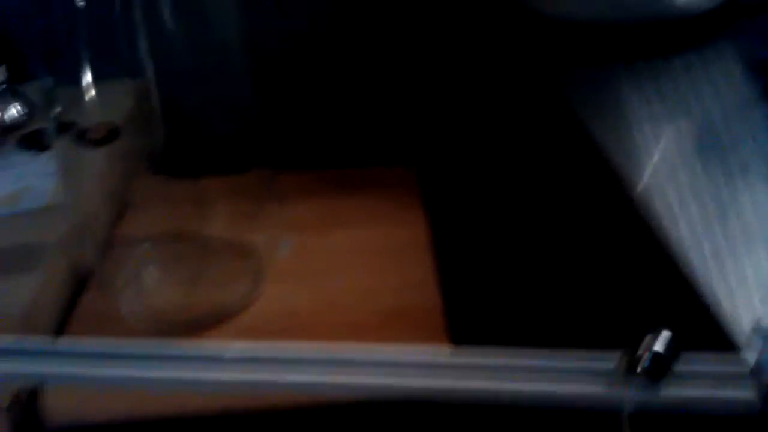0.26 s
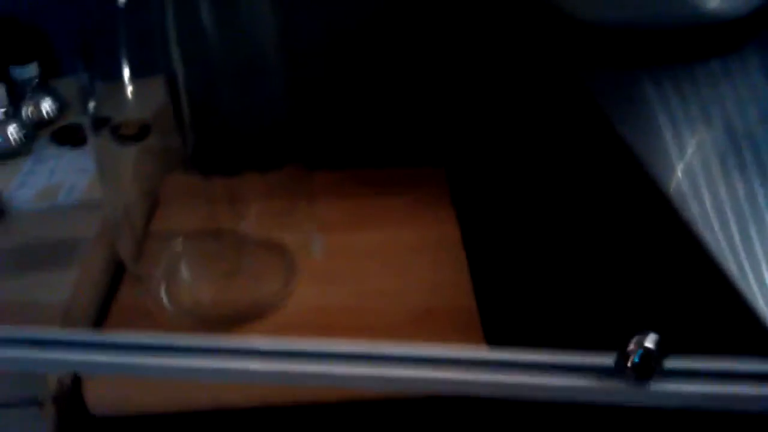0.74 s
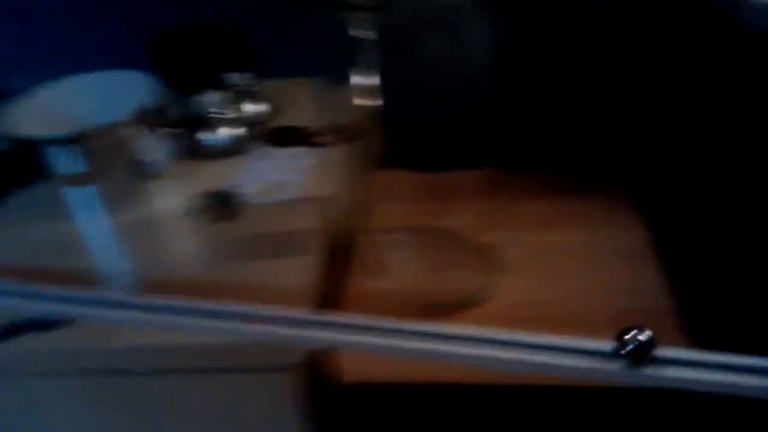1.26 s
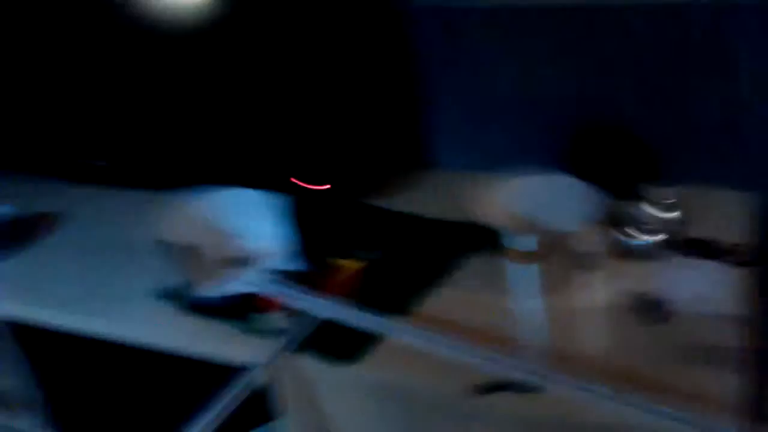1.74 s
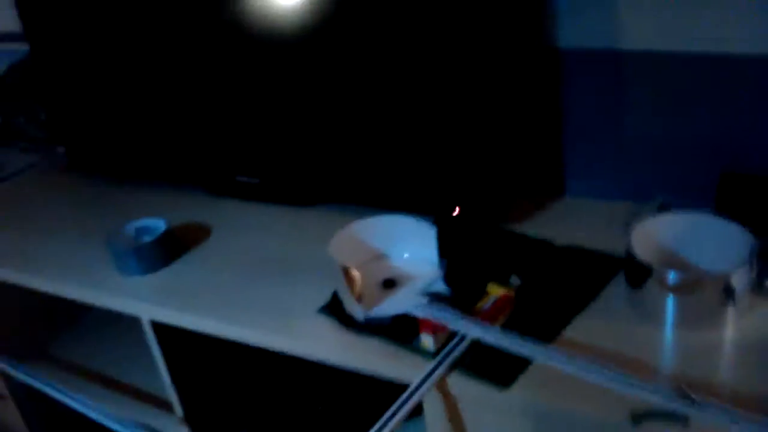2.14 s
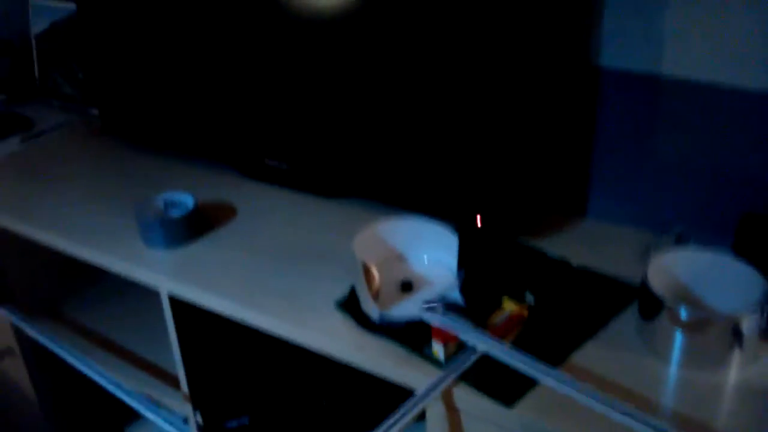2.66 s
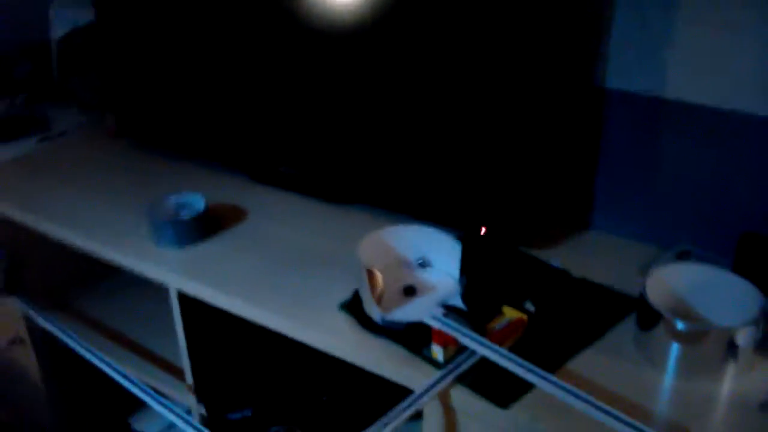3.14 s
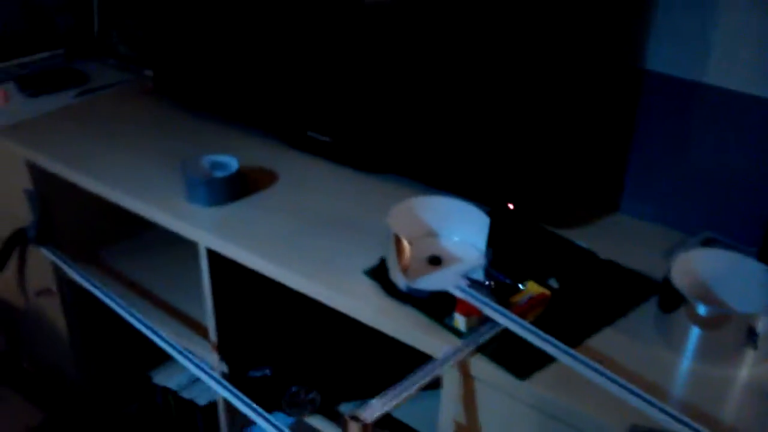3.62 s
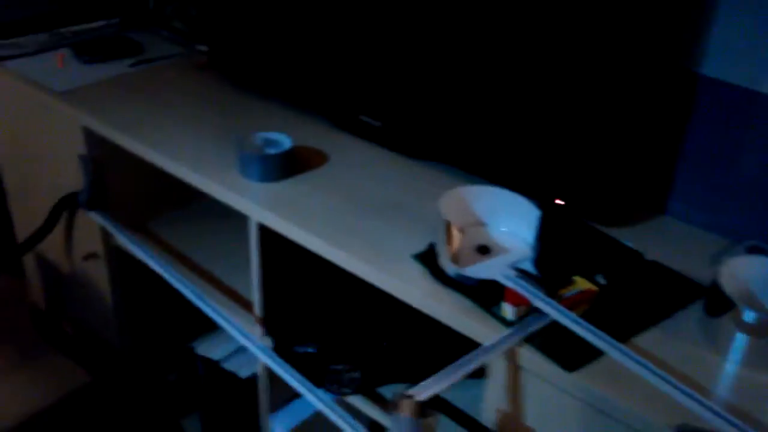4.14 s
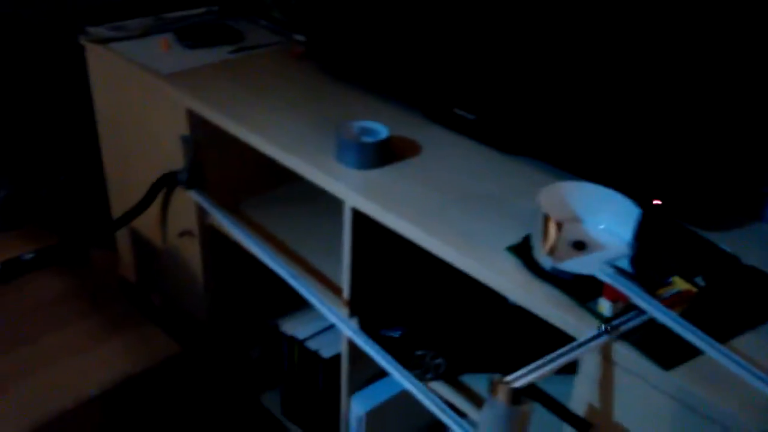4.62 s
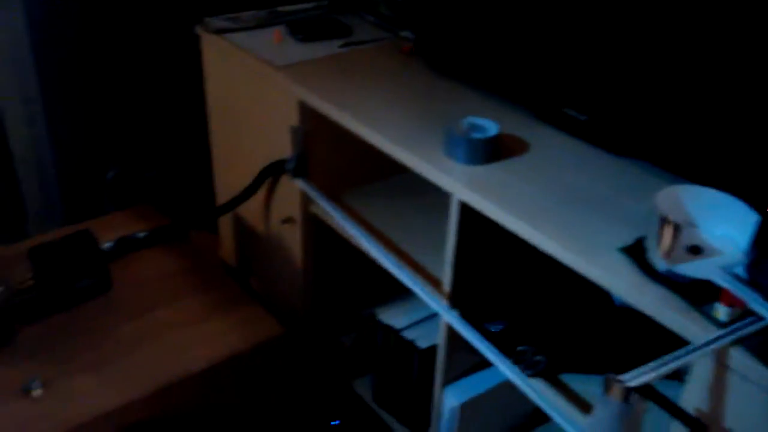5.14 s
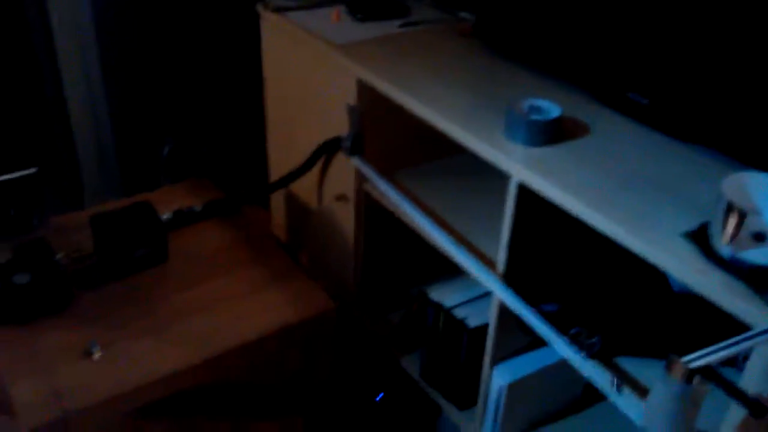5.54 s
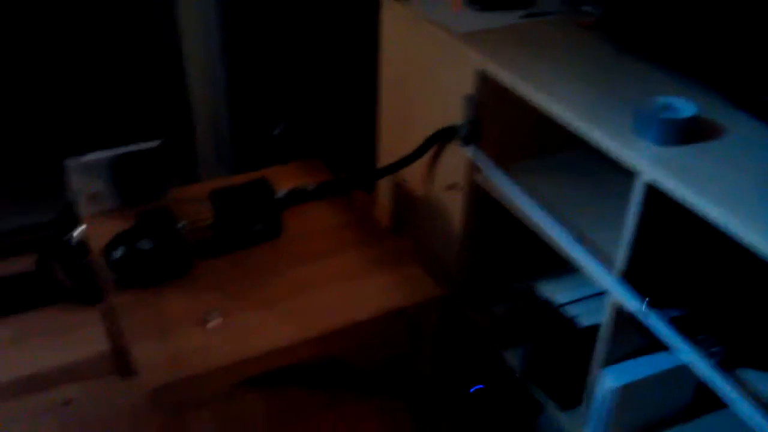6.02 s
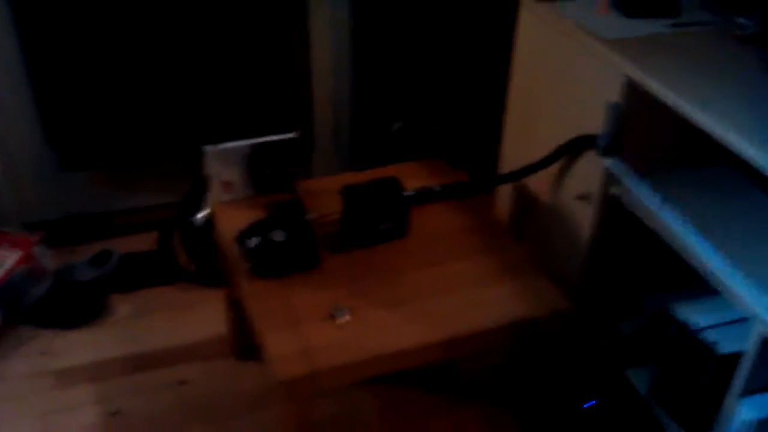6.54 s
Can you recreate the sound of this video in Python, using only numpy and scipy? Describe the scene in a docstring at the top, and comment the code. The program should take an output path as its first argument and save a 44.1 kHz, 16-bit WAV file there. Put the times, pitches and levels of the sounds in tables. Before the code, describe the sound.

A small, fairly dry room with soft noise and a faint mains buzz that weakens as the close microphone turns away. Tiny ticks come at 0.1, 0.4 and 0.85 s as a steel ball barely creeps on a metal rail. Light knocks at 1.2-1.4 s precede a sharp clack over a joint at 1.5; bright, grainy rolling then gathers speed until a hard stop at 2.8. Hollow cup knocks follow at 2.9-3.1, then thin hissing scrapes until 3.6, ending in a fuller rub. Rattling from 3.7 gives way to a loud clack at 4.0. After a pause, the ball lands ringing on a duller rail at 4.5, rolling faster from 4.9 with cup knocks near 5.2. At 5.3 a huge, clipped crash thumps the wooden cabinet; clanging bounces fade by 5.7. Brighter rolling swells from 5.9, with a knock at 6.45, still running at the end.

```python
"""A chain-reaction machine in a small room: a steel ball creeps down a metal rail, clacks over a joint and gathers speed.
It hits the end stop, knocks about in a cup, scrapes, and rattles a loose part until that gives way with a clack.
It drops onto a duller second rail, rolls on, crashes against the cabinet and runs down a brighter third rail.
Noise bumps and cracks ring each body's resonances, decaying sines add clear tones, and the loudest blows clip.
Under it all lies room noise and a faint mains buzz that fades as the microphone turns away."""
import sys
import numpy as np
from scipy import signal
from scipy.fft import rfft, irfft, next_fast_len
from scipy.io import wavfile
from scipy.ndimage import map_coordinates

SR = 44100
rng = np.random.default_rng(int(sys.argv[2]) if len(sys.argv) > 2 else 0)


def output_pcm(signal):
    """Save a mono or channel-first signal as 16-bit PCM at the path in sys.argv[1].

    Samples are clipped to [-1, 1] before scaling.
    """
    pcm = np.clip(np.atleast_2d(signal).T, -1, 1) * 32767
    wavfile.write(sys.argv[1], SR, np.round(pcm).astype(np.int16))


N = 298557
T = np.arange(N) / SR
SIZE = 16384  # FFT length for body responses, samples
GRID = np.fft.rfftfreq(SIZE, 1 / SR)


def amp(db):
    """Decibels to gain."""
    return 10 ** (np.asarray(db) / 20)


def unit(x):
    """Scaled to rms 1."""
    return x / np.sqrt(np.mean(x ** 2) + 1e-20)


def along(points, hz):
    """Curve through (Hz, value) points, read on a log frequency axis."""
    f, value = np.transpose(points)
    return np.interp(np.log(hz + 1), np.log(f + 1), value)


def wobble(rate):
    """A smooth random curve with rate knots a second."""
    knots = rng.standard_normal(int(N * rate / SR) + 4)
    return map_coordinates(knots, [T * rate])


def response(colour, modes=(), dense_db=0):
    """Minimum-phase impulse response of a body: separate resonances standing on a dense bed of others."""
    power = amp(along(colour, GRID) + dense_db) ** 2
    for hz, half_width, db in modes:
        resonance = amp(db) / (1 + ((GRID - hz) / half_width) ** 2)
        power = power + resonance ** 2
    # folding the cepstrum makes the response start at once
    cepstrum = irfft(np.log(power + 1e-12) / 2)
    cepstrum[1:SIZE // 2] *= 2
    cepstrum[SIZE // 2 + 1:] = 0
    h = irfft(np.exp(rfft(cepstrum)))[:SIZE // 2]
    return h / np.linalg.norm(h)


def through(x, h):
    """x played through an impulse response."""
    return signal.fftconvolve(x, h)[:len(x)]


def noise(colour):
    """Coloured noise of rms 1."""
    return unit(through(rng.standard_normal(N), response(colour)))


def sustained(body, tail_db, t60):
    """Long metal keeps many weak modes ringing, here as a decaying noise tail."""
    t = np.arange(len(body)) / SR
    tail = rng.standard_normal(len(t)) * amp(-60 * t / t60)
    return body + amp(tail_db) * through(body, tail / np.linalg.norm(tail))


def rocking(swing_s, rate, speedup, depth_db):
    """Swell in dB of a ball rocking from bar to bar, ever faster, dying away around its widest swing."""
    settle_s = 0.21  # time to fall to 1/e, on both sides
    t = T - swing_s
    swings = rate * t + speedup * t ** 2 / 2
    return depth_db * np.exp(-np.abs(t) / settle_s) * np.cos(2 * np.pi * swings)


def roll(rows, rock, body, bumps, spread_db, patchy_db, uneven_db, low_db, high_db, fizz_db, high_grows, fizz_grows):
    """A rolling ball meets many tiny bumps a second, each ringing the rail; the faster it runs, the brighter."""
    full_pace_db = -27  # rolling level of a fast ball
    s, level = np.transpose(rows)
    pace_db = np.interp(T, s, level, left=-120) - full_pace_db
    hits = rng.random(N) < bumps / SR
    strengths = rng.standard_normal(N) * amp(spread_db * rng.standard_normal(N))
    hz, _, spectrum = signal.stft(through(hits * strengths, body), SR, nperseg=1024)
    # resonances swell and fade as the ball passes their nodes
    smoothing = np.outer(np.hanning(6), np.hanning(9))
    nodes = signal.fftconvolve(rng.standard_normal(spectrum.shape), smoothing, "same")
    spectrum = spectrum * amp(patchy_db * unit(nodes))
    below_high = 1 / (1 + (hz / 2900) ** 12)
    below_fizz = 1 / (1 + (hz / 6500) ** 12)
    bands = [(below_high, 1, low_db),
             (below_fizz - below_high, high_grows, high_db),
             (1 - below_fizz, fizz_grows, fizz_db)]
    out = np.zeros(N)
    for band, grows, db in bands:
        sound = signal.istft(spectrum * band[:, None], nperseg=1024)[1][:N]
        out += unit(sound) * amp(db + grows * pace_db)
    dying_db = 850 * np.maximum(T - s[-1], 0)  # the rail rings out once the ball has left it
    return out * amp(full_pace_db + rocking(*rock) + uneven_db * wobble(35) - dying_db)


def rebounds(rows, count, gap_s, loss_db):
    """Every blow is a quick run of contacts, each weaker than the one before."""
    contacts = []
    for s, ring, tick in rows:
        for k in range(count):
            contacts.append((s + k * gap_s, ring - k * loss_db, tick - k * loss_db))
    return contacts


# wood under the rails: pitch_hz [Hz], level_db [dB, relative]
WOOD_COLOUR = [(25, -42.5), (100, -30.5), (170, -26), (230, 3.5), (310, 1), (550, -5), (900, -3.5),
               (1500, -9.5), (3000, -10), (8000, -77.5)]
# cabinet boards: pitch_hz [Hz], half_width_hz [Hz, to half amplitude], level_db [dB, relative]
BOARD_MODES = [(262, 45, -14.5), (545.5, 30, -3), (1140, 29, -12.5)]
# steel on steel: pitch_hz [Hz], level_db [dB, relative]
STEEL_COLOUR = [(3000, -48), (6000, 2.5), (8500, 6.5), (11000, 1), (15500, -4.5)]


def strikes(rows, body, t60, crack_s, chatter_db, thud_db, thud_life, tick_life):
    """A short crack and a dying chatter ring the body, thud in the wood and tick on the steel ball."""
    out = np.zeros(N + SR)
    t = np.arange(SR // 2) / SR
    wood = response(WOOD_COLOUR, BOARD_MODES)
    steel = response(STEEL_COLOUR)
    head = SR // 100  # levels are set on the first 10 ms
    for s, ring, tick in rows:
        layers = [(body, ring, t60),
                  (wood, ring + thud_db, t60 * thud_life),
                  (steel, tick, t60 * tick_life)]
        for h, db, life in layers:
            crack = amp(-60 * t / crack_s)
            chatter = amp(chatter_db - 60 * t / life)
            sound = through((crack + chatter) * rng.standard_normal(len(t)), h)
            out[round(s * SR):][:len(t)] += amp(db) * sound / np.std(sound[:head])
    return out[:N]


def tones(rows, modes, db, spread_db):
    """Every blow rings the rail's clear tones, decaying sines, at new strengths."""
    out = np.zeros(N + SR)
    t = np.arange(SR // 2) / SR
    hz, level, t60 = np.transpose(modes)[:, :, None]
    onset = 1 - np.exp(-t / 0.0038)
    for s, ring, *_ in rows:
        size, phase = rng.standard_normal((2, len(hz), 1))
        decay = amp(level + spread_db * size - 60 * t / t60)
        partials = decay * np.sin(2 * np.pi * hz * t + np.pi * phase)
        out[round(s * SR):][:len(t)] += amp(ring + db) * partials.sum(0) * onset
    return out[:N]


# pace of the ball, as its rolling level before the band trims: time_s [s], level_db [dB]
FIRST_ROLL = [(0.9, -62.5), (1.19, -52), (1.3, -42.5), (1.66, -37.5), (1.89, -36.5), (1.95, -32),
              (2.24, -29), (2.33, -31.5), (2.45, -25), (2.82, -25.5)]
# rocking between the bars: widest_s [s], rate [swings/s], speedup [swings/s per s], depth_db [dB]
FIRST_ROCK = (1.21, 25, 1.6, 4.1)
# broad colour of the rail: pitch_hz [Hz], level_db [dB, relative]
FIRST_COLOUR = [(150, -65.5), (250, -35.5), (341, -18), (420, -15), (534, -11.5), (1120, -6.5), (1730, 2),
                (3390, -11), (3960, 2), (4630, -4.5), (6100, -13), (7130, -25), (7770, -12.5),
                (15500, -44.5)]
# rail resonances: pitch_hz [Hz], half_width_hz [Hz, to half amplitude], level_db [dB, relative]
FIRST_MODES = [(1306, 19, -0.5), (1763, 39, -5), (1892, 43, -5), (2246, 71, -6), (2750, 64, -13),
               (3095, 23, -1.5), (3443, 110, -7), (3770, 100, -2.5), (4218, 24, 1), (4970, 100, -6),
               (5474, 72, -4), (5970, 80, -5.5), (6710, 96, -12.5), (7270, 17, -10), (7260, 30, -21.5),
               (7645, 66, -7), (8400, 68, -14.5), (9220, 41, -17.5), (9800, 180, -27.5), (9920, 46, -31.5),
               (10600, 110, -25.5)]
# knocks on the rail: start_s [s], ring_db [dB], tick_db [dB]
FIRST_HITS = [(0.1244, -52.5, -55), (0.4122, -59, -58), (0.851, -54, -56), (1.2067, -41.5, -59),
              (1.273, -39, -53), (1.3277, -39, -58.5), (1.4067, -49, -64), (1.545, -25.5, -48.5),
              (1.6394, -25.5, -44), (1.6566, -26, -47.5), (1.70, -29, -56.5), (1.797, -33.5, -49),
              (2.0836, -28, -33.5), (2.40, -27, -54.5), (2.822, -11, -21.5)]
# blow over the joint: start_s [s], ring_db [dB], tick_db [dB]
JOINT_BLOW = [(1.4792, -16, -22)]


def first_rail():
    """The ball creeps, clacks over a joint, gathers speed and hits the end stop."""
    body = sustained(response(FIRST_COLOUR, FIRST_MODES, dense_db=-6.5), tail_db=-8, t60=0.13)
    rolling = roll(FIRST_ROLL, FIRST_ROCK, body, bumps=3500, spread_db=0.5, patchy_db=4.0, uneven_db=1.02,
                   low_db=0, high_db=-0.66, fizz_db=-13, high_grows=1.15, fizz_grows=1.3)
    knocks = strikes(FIRST_HITS, body, t60=0.16, crack_s=0.006, chatter_db=-9.5,
                     thud_db=-30, thud_life=0.84, tick_life=0.93)
    clack = strikes(JOINT_BLOW, body, t60=0.41, crack_s=0.037, chatter_db=-6.5,
                    thud_db=-11, thud_life=0.89, tick_life=0.55)
    return rolling + knocks + clack


# pace of the ball, as its rolling level before the band trims: time_s [s], level_db [dB]
SECOND_ROLL = [(4.62, -47), (4.85, -47), (4.94, -32.5), (5.0, -26.5), (5.08, -31), (5.125, -29),
               (5.165, -31.5), (5.21, -22), (5.255, -26)]
# rocking between the bars: widest_s [s], rate [swings/s], speedup [swings/s per s], depth_db [dB]
SECOND_ROCK = (5.0, 45, 6.9, 3.4)
# broad colour of the rail: pitch_hz [Hz], level_db [dB, relative]
SECOND_COLOUR = [(350, -61), (600, -25), (878, -32), (979, -16.5), (1230, -10.5), (2610, -1), (3330, -18),
                 (4030, -11), (5660, -19), (6670, -30), (6950, -44), (8750, -32), (9370, -62.5),
                 (15500, -51)]
# rail resonances: pitch_hz [Hz], half_width_hz [Hz, to half amplitude], level_db [dB, relative]
SECOND_MODES = [(1640, 14, -22.5), (1771, 21, 6), (1960, 82, 3), (2170, 90, 5), (2673, 72, 0.5),
                (3930, 29, 2), (4260, 21, -2), (4520, 45, -10), (6230, 35, -11)]
# clear tones when struck: pitch_hz [Hz], level_db [dB, relative, before the spread], t60_s [s]
SECOND_TONES = [(2010, 6, 0.125), (2270, 11, 0.12), (3709, -18, 0.17), (4070, 0, 0.08), (4360, -5, 0.16),
                (5060, -4, 0.13), (5880, -7.5, 0.13), (6410, 2, 0.15), (8650, -13, 0.19),
                (14400, -29, 0.11)]
# the ball landing: start_s [s], ring_db [dB, first contact], tick_db [dB, first contact]
LANDING_BLOW = [(4.4978, -13, -31.5)]
# later knocks: start_s [s], ring_db [dB], tick_db [dB]
SECOND_HITS = [(4.7056, -34, -75), (4.8584, -37.5, -69), (4.9239, -27, -62), (5.1015, -25.5, -63)]


def second_rail():
    """The ball clacks onto a duller rail, setting off its clear tones, and rolls to its end."""
    body = sustained(response(SECOND_COLOUR, SECOND_MODES, dense_db=2.5), tail_db=-4.5, t60=.15)
    rolling = roll(SECOND_ROLL, SECOND_ROCK, body, bumps=5000, spread_db=3.8, patchy_db=-3.0, uneven_db=1.9,
                   low_db=0.5, high_db=-7.5, fizz_db=-34.5, high_grows=1.46, fizz_grows=1.2)
    landing = rebounds(LANDING_BLOW, count=4, gap_s=0.0137, loss_db=2.5)
    clacks = strikes(landing + SECOND_HITS, body, t60=0.12, crack_s=0.0222, chatter_db=15,
                     thud_db=-42.5, thud_life=0.49, tick_life=0.4)
    clear_tones = tones(landing, SECOND_TONES, db=-12.5, spread_db=4.5)
    return rolling + clacks + clear_tones


# pace of the ball, as its rolling level before the band trims: time_s [s], level_db [dB]
THIRD_ROLL = [(5.6, -67), (5.72, -43), (5.95, -36), (6.03, -29), (6.29, -29.5), (6.47, -24.5), (6.63, -27),
              (6.77, -24.5)]
# rocking between the bars: widest_s [s], rate [swings/s], speedup [swings/s per s], depth_db [dB]
THIRD_ROCK = (6.08, 11.6, 9, 5.3)
# broad colour of the rail: pitch_hz [Hz], level_db [dB, relative]
THIRD_COLOUR = [(410, -59), (700, -30.5), (850, -48.5), (955, -26), (1630, -11), (1900, -11), (2220, -8.5),
                (3680, -10), (4030, 3), (5640, -5.5), (7400, -24), (8320, -24.5), (15500, -55)]
# rail resonances: pitch_hz [Hz], half_width_hz [Hz, to half amplitude], level_db [dB, relative]
THIRD_MODES = [(2220, 39, -8), (2550, 20, -3.5), (2960, 150, -5), (3240, 48, -0.5), (3540, 170, -3),
               (3916, 76, 8.5), (4440, 9.3, -3.5), (5070, 48, 2), (5490, 34, -1), (5900, 17, -4.5),
               (6310, 200, -12.5), (6660, 57, -25), (7400, 34, -13.5), (7720, 77, -18.5), (8500, 44, -15.5),
               (8230, 44, -38.5), (8910, 73, -27.5), (9130, 50, -24.5), (9900, 24, -27)]
# clear tones when struck: pitch_hz [Hz], level_db [dB, relative, before the spread], t60_s [s]
THIRD_TONES = [(3219, -1, 0.15), (3930, 0, 0.28), (4996, -6, 0.24), (5480, -9, 0.2), (8200, -14, 0.2),
               (8400, -14, 0.2)]
# blow against the cabinet: start_s [s], ring_db [dB, first contact], tick_db [dB, first contact]
CRASH_BLOW = [(5.306, -9, -7)]
# bounces on the rail: start_s [s], ring_db [dB], tick_db [dB]
THIRD_HITS = [(5.344, -2, -20), (5.357, -9, -16.5), (5.4313, -17.5, -34), (5.472, -22, -47),
              (5.529, -17, -37), (5.5709, -22.5, -44.5), (5.605, -34.5, -54.5), (5.6814, -67, -50.5),
              (6.4567, -21.5, -36)]


def third_rail():
    """A heavy blow on the cabinet sets the last rail ringing; the ball bounces on it and speeds away."""
    body = sustained(response(THIRD_COLOUR, THIRD_MODES, dense_db=-2), tail_db=-10, t60=.12)
    rolling = roll(THIRD_ROLL, THIRD_ROCK, body, bumps=6600, spread_db=2.0, patchy_db=3.0, uneven_db=0.63,
                   low_db=-6.5, high_db=0.0, fizz_db=-16, high_grows=1.64, fizz_grows=3.8)
    bounces = strikes(THIRD_HITS, body, t60=0.22, crack_s=0.0099, chatter_db=7.5,
                      thud_db=-52.5, thud_life=0.58, tick_life=0.8)
    blows = rebounds(CRASH_BLOW, count=4, gap_s=0.0127, loss_db=2.3)
    crash = strikes(blows, body, t60=0.09, crack_s=0.059, chatter_db=-5.5,
                    thud_db=8.0, thud_life=.7, tick_life=1.1)
    clang = tones(THIRD_HITS, THIRD_TONES, db=-16.5, spread_db=2)
    return rolling + bounces + crash + clang


# broad colour of the cups: pitch_hz [Hz], level_db [dB, relative]
CUP_COLOUR = [(150, -59), (250, -25), (781, -9), (995, -13.5), (1160, -4.5), (1290, 6), (1820, -10),
              (2200, -4.5), (2900, -18.5), (3830, -9), (6770, -15), (8180, -13.5), (15500, -48)]
# cup resonances: pitch_hz [Hz], half_width_hz [Hz, to half amplitude], level_db [dB, relative]
CUP_MODES = [(980, 31, -3.5), (1290, 110, -8.5), (1590, 130, -2.5), (2020, 68, -7), (4100, 24, -10.5),
             (4560, 94, -16.5)]
# knocks in the cups: start_s [s], ring_db [dB, first contact], tick_db [dB, first contact]
CUP_HITS = [(2.9017, -15.5, -27), (2.9738, -18, -38), (3.048, -35, -43), (3.0954, -41.5, -48.5),
            (5.1764, -23, -34), (5.2025, -25.5, -27), (5.2907, -18, -41)]


def cup():
    """The ball bounces in the hollow cups at the ends of the rails."""
    body = response(CUP_COLOUR, CUP_MODES, dense_db=-5)
    contacts = rebounds(CUP_HITS, count=2, gap_s=0.012, loss_db=3.0)
    return strikes(contacts, body, t60=0.15, crack_s=0.0062, chatter_db=5,
                   thud_db=-41, thud_life=.9, tick_life=1.0)


# the loose part before it gives way: pitch_hz [Hz], level_db [dB, relative]
LOOSE_COLOUR = [(290, -44.5), (500, -24), (914, -28.5), (1240, -8), (1370, -10), (1620, -5.5), (2570, 0.5),
                (2800, -8.5), (3630, -6.5), (7130, -33), (10100, -37.5), (15500, -66.5)]
# rattling against it: start_s [s], ring_db [dB, first contact], tick_db [dB, first contact]
RATTLE_HITS = [(3.706, -25, -38.5), (3.7366, -20.5, -57.5), (3.8197, -33, -56.5), (3.8841, -46, -60),
               (3.925, -43, -68), (3.9768, -35, -61.5), (3.9946, -21.5, -45)]
# the part as it gives way: pitch_hz [Hz], level_db [dB, relative]
TRIP_COLOUR = [(290, -59.5), (500, -23), (737, -13), (968, -13), (1270, -8), (1850, 2.5), (3430, -9.5),
               (3900, 3.5), (4640, -16), (5130, -14), (6740, -23.5), (12000, -28), (15500, -39)]
# its resonances: pitch_hz [Hz], half_width_hz [Hz, to half amplitude], level_db [dB, relative]
TRIP_MODES = [(1577, 9.1, 2), (1830, 72, -3.5), (2210, 44, -6.5), (2700, 39, 0.5), (2765, 96, 4),
              (3240, 14, -8.5), (3740, 22, -4.5), (4110, 15, -11), (3930, 54, -1.5), (4410, 63, -3.5),
              (5070, 180, -2), (5130, 24, -10), (6300, 47, -9)]
# the loose part falling: start_s [s], ring_db [dB, first contact], tick_db [dB, first contact]
FALL_BLOW = [(4.010, -0.86, -18.5)]


def trip():
    """The ball rattles against a loose part, which gives way with a loud clack."""
    contacts = rebounds(RATTLE_HITS, count=2, gap_s=0.012, loss_db=1.5)
    rattle = strikes(contacts, response(LOOSE_COLOUR), t60=0.12, crack_s=.015, chatter_db=19,
                     thud_db=-24, thud_life=0.76, tick_life=.7)
    body = sustained(response(TRIP_COLOUR, TRIP_MODES, dense_db=-0.5), tail_db=-7.5, t60=0.16)
    blows = rebounds(FALL_BLOW, count=3, gap_s=0.011, loss_db=4.5)
    clack = strikes(blows, body, t60=0.19, crack_s=0.032, chatter_db=-1,
                    thud_db=-22.5, thud_life=0.51, tick_life=.65)
    return rattle + clack


# the ball sliding: loudest_s [s], length_s [s], hiss_db [dB at the peak], rub_db [dB at the peak]
SLIDES = [(1.732, 0.058, -30.5, -60), (3.143, 0.048, -41.5, -48), (3.197, 0.072, -32, -54),
          (3.318, .056, -28.5, -55), (3.418, 0.5, -60.5, -57), (3.534, 0.092, -43, -48),
          (3.638, 0.082, -32.5, -20)]
# light slide: pitch_hz [Hz], level_db [dB, relative]
HISS_COLOUR = [(1470, -57.5), (2500, -34), (5080, -12.5), (6010, -5.5), (6540, -10), (7390, -8), (7860, -6),
               (9370, -1), (11200, -8), (12700, -22.5), (15500, -25)]
# hard slide: pitch_hz [Hz], level_db [dB, relative]
RUB_COLOUR = [(130, -63), (220, -26), (418, -8.5), (982, -4), (1070, -1.5), (1500, -4.5), (2190, -6.5),
              (2860, -12), (3180, -8.5), (6590, -12.5), (10900, -14), (15500, -26.5)]


def scrapes():
    """Mostly short slides, and one long faint one, swell and fade: a thin hiss if light, a full rub if pressed."""
    hiss, rub = noise(HISS_COLOUR), noise(RUB_COLOUR)
    out = np.zeros(N)
    for s, length, hiss_db, rub_db in SLIDES:
        stroke = np.cos(np.pi * np.clip((T - s) / length, -.5, .5)) ** 2
        out += stroke * (amp(hiss_db) * hiss + amp(rub_db) * rub)
    return out * amp(1.2 * wobble(400))  # fine roughness


# deep thumps under the blows: start_s [s], level_db [dB]
THUMP_STARTS = [(1.479, -52), (2.82, -39), (2.903, -50), (4.010, -39), (4.499, -68), (5.309, -10),
                (5.329, -13)]
# low noise of the thumps: pitch_hz [Hz], level_db [dB, relative]
DEEP_COLOUR = [(25, -1.5), (55, -2), (130, 2), (220, 1), (400, -28), (1500, -69.5)]


def thumps():
    """Deep thumps under the blows: brief low noise that starts at once and dies away."""
    t60_s = 0.08
    envelope = np.zeros(N)
    for s, db in THUMP_STARTS:
        envelope += (T >= s) * amp(db - 60 * np.abs(T - s) / t60_s)
    return noise(DEEP_COLOUR) * envelope


# mains overtones: pitch_hz [Hz, rounded to a mains multiple], level_db [dB, before trim and waver]
HUM_TONES = [(344.5, -58.5), (393.0, -60), (446.8, -64.5), (495.3, -69), (543.7, -63.5), (742.9, -80.5),
             (839.8, -70), (888.2, -70), (942.1, -71), (1039, -70.5), (1136, -77), (1184, -68)]
# room noise: pitch_hz [Hz], level_db [dB, relative]
AIR_COLOUR = [(35, -75.5), (90, -62), (150, -28.5), (216, -25), (238, -15), (267, -18.5), (345, -15.5),
              (416, -20.5), (550, -19), (590, -17), (919, -25), (1500, -21), (1650, -18.5), (2330, -24.5),
              (2950, -31), (15800, -38.5)]


def background():
    """An appliance buzzes in mains overtones over steady room noise, fading as the microphone turns away."""
    mains_hz = 49.5
    turn_s = (2.3, 6.7)  # start and end of the turn
    # level trims before and after the turn
    buzz_db, strongest_db = (-0.3, -4), (3.5, -10)
    phase = 2 * np.pi * mains_hz * T + .02 * wobble(6.6)
    strongest = max(db for hz, db in HUM_TONES)
    out = noise(AIR_COLOUR) * amp(-55)
    for hz, db in HUM_TONES:
        trim_db = np.interp(T, turn_s, strongest_db if db == strongest else buzz_db)
        level = db + trim_db + 0.8 * wobble(2)
        overtone = np.cos(round(hz / mains_hz) * phase + .6 * rng.standard_normal())
        out += amp(level) * np.sqrt(2) * overtone
    return out


# reverberation: pitch_hz [Hz], t60_s [s]
ROOM_DECAY = [(100, 0.05), (1000, 0.047), (4000, 0.24), (12000, 0.1)]


def room(x):
    """A small furnished room answers with a brief noise tail, its decay time set by frequency."""
    hz, t, spectrum = signal.stft(rng.standard_normal(SR // 2), SR, nperseg=256)
    decay = amp(-60 * t / along(ROOM_DECAY, hz)[:, None])
    tail = signal.istft(spectrum * decay, SR, nperseg=256)[1]
    tail = np.pad(tail, (SR // 200, 0))  # 5 ms before the answer
    return through(x, tail / np.linalg.norm(tail))


def scene():
    """The whole run of the machine in its room."""
    rails = first_rail() + second_rail() + third_rail()
    machine = rails + cup() + trip() + scrapes() + thumps()
    return (machine + amp(-16) * room(machine) + background())[None]


def record(dry):
    """The microphone clips on the loudest blows; nothing is kept above the band limit."""
    top_hz = 16200
    clipped = dry / (1 + np.abs(dry / .93) ** 6) ** (1 / 6)
    m = next_fast_len(N + SIZE)
    kept = np.fft.rfftfreq(m, 1 / SR) < top_hz
    return irfft(rfft(clipped, m) * kept, m)[..., :N]


dry = scene()
out = record(dry)
output_pcm(out)
```